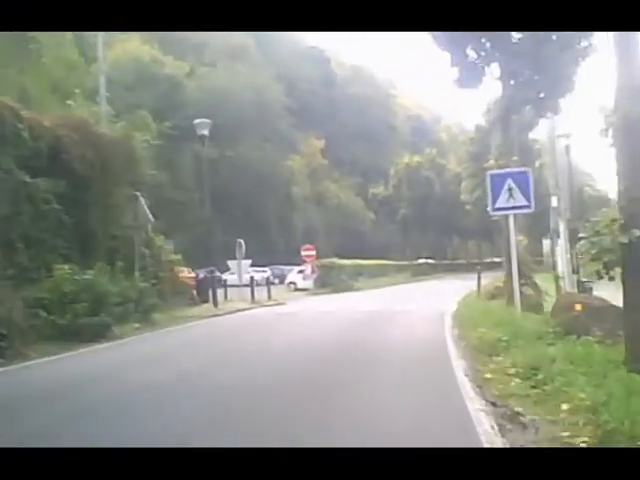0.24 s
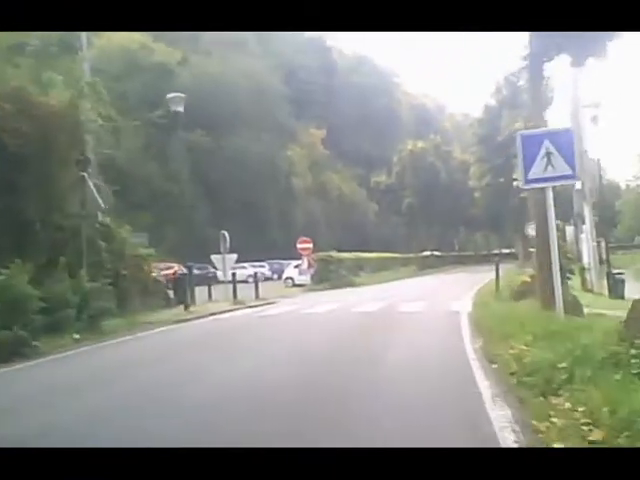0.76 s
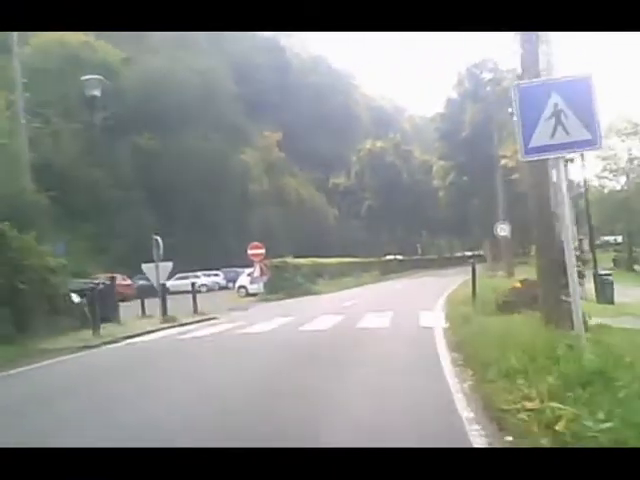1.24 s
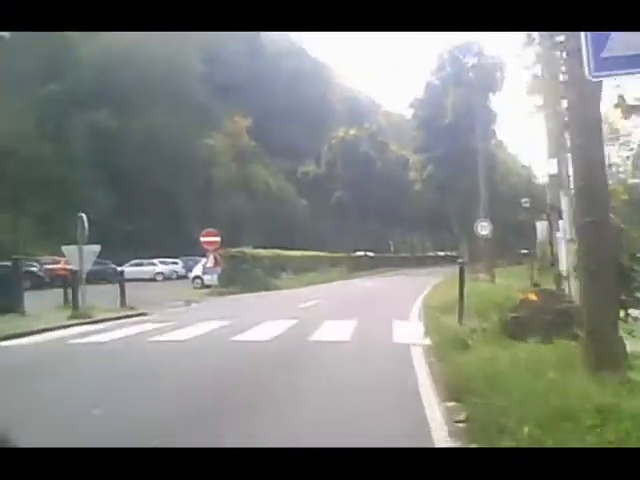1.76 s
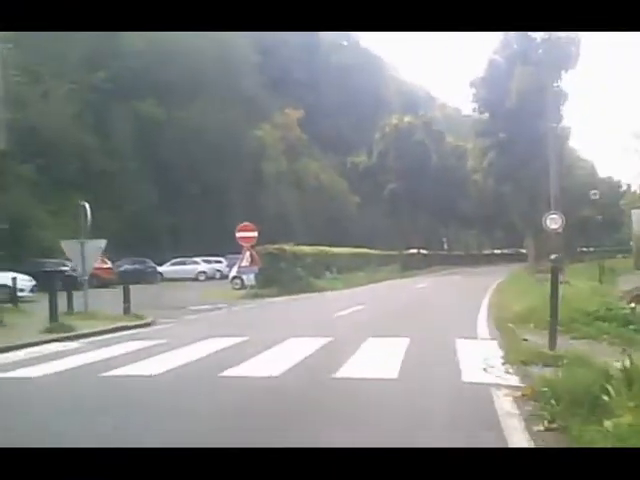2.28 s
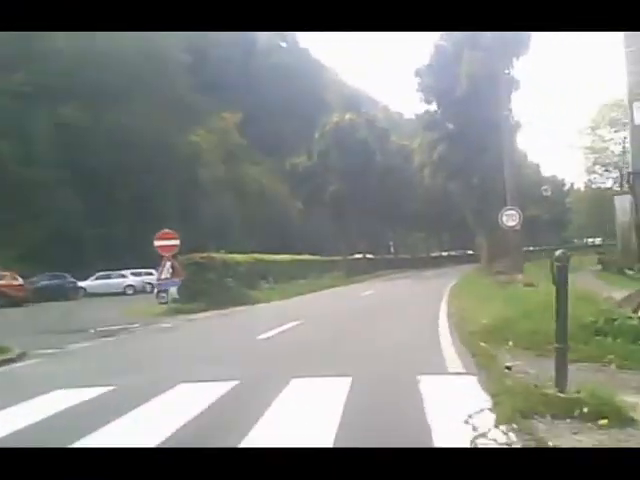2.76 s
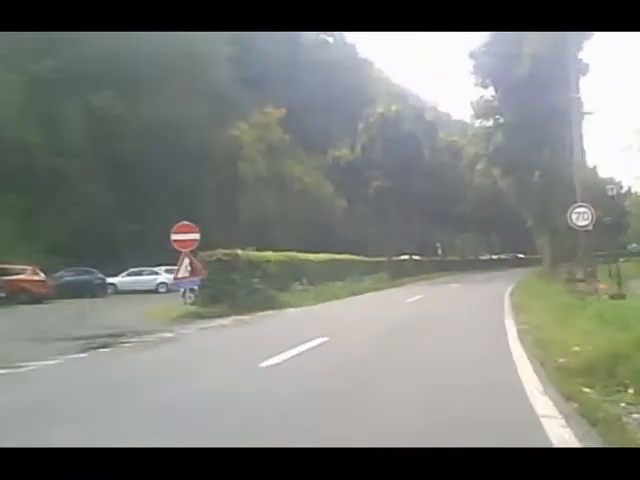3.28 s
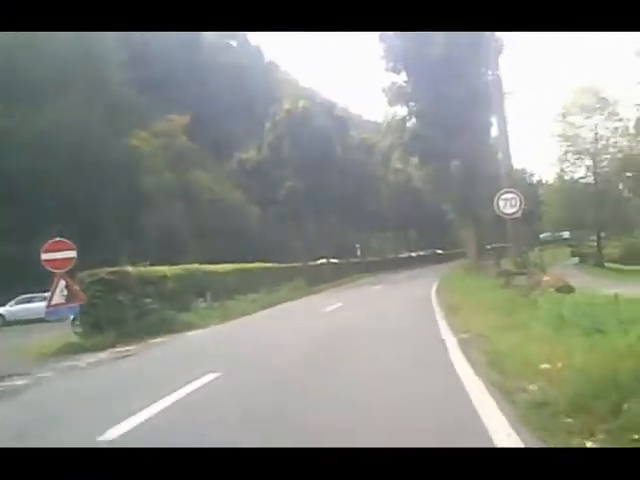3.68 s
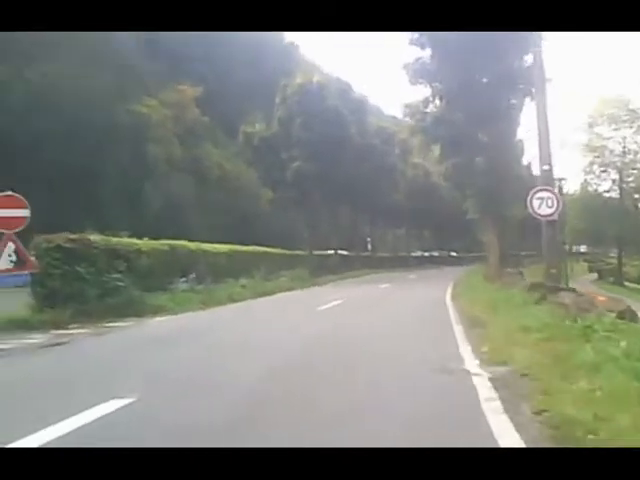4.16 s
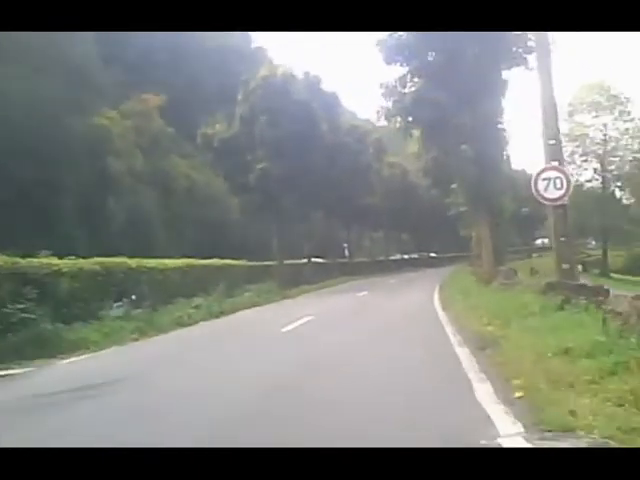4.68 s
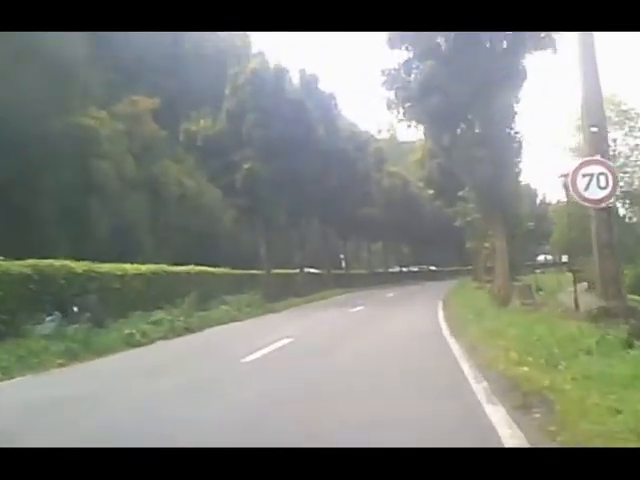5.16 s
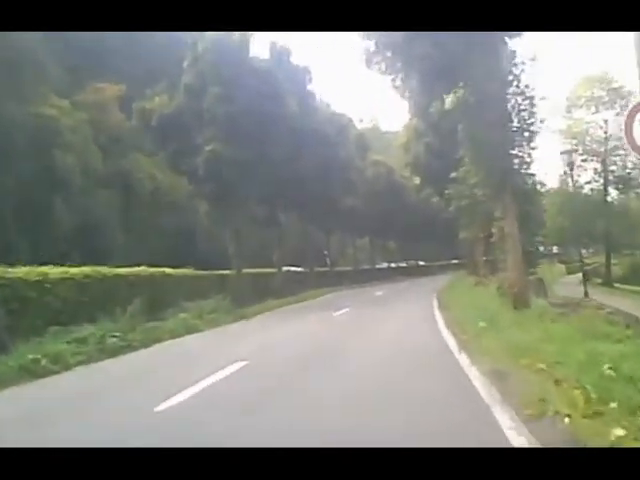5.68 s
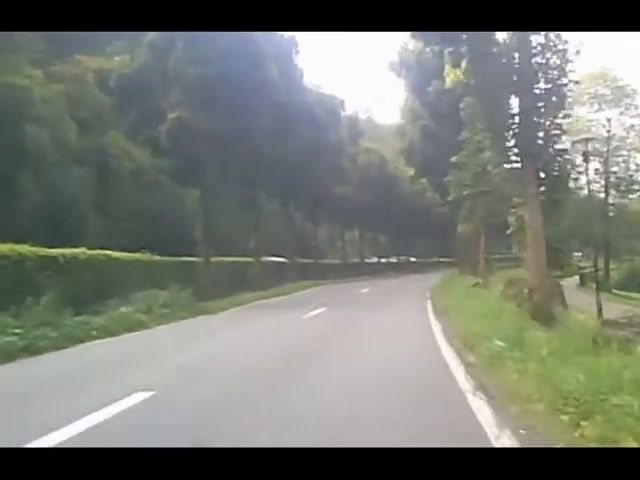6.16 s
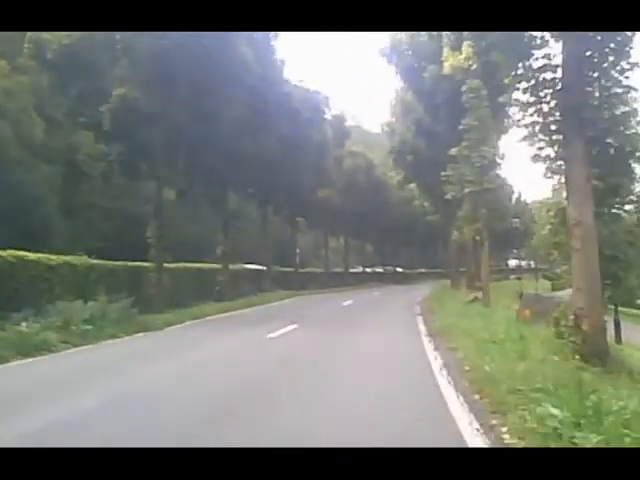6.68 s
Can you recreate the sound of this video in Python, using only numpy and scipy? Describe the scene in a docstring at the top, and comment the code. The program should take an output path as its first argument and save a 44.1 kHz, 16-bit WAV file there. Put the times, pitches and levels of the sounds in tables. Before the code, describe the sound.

A steady drive captured by a small, narrow-band microphone in the cabin. Deep humming rumble wavers continuously, with boxy road roar and soft hiss. Early on, the wheels hit rough road and crisp, dry plastic knocks come in irregular clusters, some distorting. After three seconds it calms to plain rolling noise, broken by a brief dropout and a single clack late on, then a faint tap.

```python
"""A low, wavering boom and a hollow roar fill a car rolling along a country road, under a band of hiss.
A randomly wavering low hum and a noisy rumble make the boom; noise through cabin resonances makes the roar,
and its bursts the jolts. Over a rough stretch loose plastic rattles and chatters: decaying sine modes struck
singly or by random taps. Faint bright ticks run throughout. The narrow-band sound overloads on the rattles,
and the level dips briefly twice."""
import sys
import numpy as np
from scipy import signal
from scipy.fft import rfft, irfft, next_fast_len
from scipy.io import wavfile
from scipy.ndimage import uniform_filter1d, map_coordinates

SR = 44100
rng = np.random.default_rng(int(sys.argv[2]) if len(sys.argv) > 2 else 0)


def digitize_waveform(pressure):
    """Quantize a signal to 16-bit integers and store it at the path in sys.argv[1].

    Rows of a 2-D input are taken as channels; values are limited to [-1, 1].
    """
    field = np.atleast_2d(pressure).T
    bounded = np.clip(field, -1, 1)
    quanta = np.round(bounded * 32767).astype(np.int16)
    wavfile.write(sys.argv[1], SR, quanta)


N = 305613
BAND_HZ = 3900  # upper edge of the narrow band
TOP_HZ = 16000  # upper edge of the output

# modes of the loose plastic: (frequency [Hz], relative level [dB], full 60 dB decay time [s])
PLASTIC_MODES = [(935, -7, 0.025), (1338, -2.5, 0.017), (1680, -2, 0.014), (1893, -12.5, 0.03),
                 (1981, 1.5, 0.016), (2370, -5.5, 0.01), (2760, -20.5, 0.024), (3357, -18, 0.0083)]
# wheels jolt over bumps: (time [s], burst level [dB], envelope length [s], centre frequency [Hz])
BUMPS = [(0.612, -10, 0.009, 700), (0.616, -7.5, 0.017, 129.4), (1.274, -15, 0.026, 720),
         (1.635, -15.5, 0.021, 280), (1.764, -13.5, 0.016, 910), (2.538, -10, 0.021, 696),
         (2.613, -17, 0.011, 950), (2.937, -11, 0.013, 850), (5.518, -15, 0.008, 900)]


def amp(db):
    """Logarithmic level: decibels to amplitude gain."""
    return 10 ** (np.asarray(db) / 20)


def unit(x):
    """Normalisation by mean power: scale to rms 1."""
    return x / np.sqrt(np.mean(x ** 2) + 1e-20)


def clock():
    """Uniform sampling: the time of every sample in seconds."""
    return np.arange(N) / SR


def curves(rows):
    """Linear interpolation in time: one curve for each column after the first."""
    times, *columns = np.transpose(rows)
    return [np.interp(clock(), times, column) for column in columns]


def colour(points, hz):
    """Spectral envelope: gain from (frequency [Hz], level [dB]) points on a log-frequency axis."""
    point_hz, db = np.transpose(points)
    return amp(np.interp(np.log(hz + 1), np.log(point_hz), db))


def wobble(rate):
    """Slow random modulation: a smooth curve through rate normal random knots a second."""
    knots = rng.standard_normal(int(N * rate / SR) + 4)
    return map_coordinates(knots, [clock() * rate])


def swell(s, length):
    """Gaussian envelope: a bell centred on time s, at 1/e one length away."""
    return np.exp(-((clock() - s) / length) ** 2)


def filtered(x, response):
    """Linear filtering: the spectrum of x times a response of frequency."""
    size = next_fast_len(N + SR // 2)
    hz = np.fft.rfftfreq(size, 1 / SR)
    return irfft(rfft(x, size) * response(hz), size)[:N]


def noise(response):
    """Subtractive synthesis: white noise shaped by a response, at rms 1."""
    return unit(filtered(rng.standard_normal(N), response))


def low_pass(x, edge_hz):
    """Band limitation: a very steep roll-off above the edge, without phase shift."""
    return filtered(x, lambda hz: 1 / np.sqrt(1 + (hz / edge_hz) ** 90))


def boom(hum_db=-1, rumble_db=-5, waver_hz=7.5, throb_db=1,
         swell_db=3.0, swells_per_second=19, sag_db=1.4, sags_per_second=9):
    """Random modulation: a randomly wavering low hum and a rumble in a resonance swell and sag together."""
    # drone drifting slowly in pitch and level: (time [s], pitch [Hz], level before both shares [dB])
    drone = [(0, 133.1, -12), (0.6, 137.1, -9.5), (1.25, 131, -12), (1.7, 136, -11), (2.25, 131, -13),
             (2.7, 137.1, -12), (3.25, 141.4, -14.0), (3.65, 140, -13.6), (4.05, 137.7, -11.5),
             (4.9, 139.9, -12), (5.4, 139.6, -12.5), (6.0, 136, -13), (6.5, 135.6, -11.5),
             (6.93, 134.9, -9.5)]
    # spectrum of the boom's noisy body: (frequency [Hz], relative density [dB per Hz])
    rumble_spectrum = [(20, -38.5), (50, -36), (75, -21.5), (100, -9.5), (122, -1), (136, -4.5), (152, 0),
                       (175, -8.5), (220, -30.5), (400, -59)]
    pitch_hz, drone_db = curves(drone)
    swelling_db = swell_db * np.tanh(wobble(swells_per_second))
    sagging_db = sag_db * np.maximum(wobble(sags_per_second), 0) ** 2
    level_db = drone_db + swelling_db - sagging_db
    # phase is the running integral of the wavering pitch
    phase = 2 * np.pi * np.cumsum(pitch_hz + waver_hz * wobble(45)) / SR
    hum = unit(np.sin(phase) * amp(throb_db * wobble(35)))
    rumble = noise(lambda hz: colour(rumble_spectrum, hz))
    return amp(level_db) * (amp(hum_db) * hum + amp(rumble_db) * rumble)


def cabin(hz):
    """Resonance: the road's vibration spectrum times the summed power responses of cabin modes."""
    # air and panel resonances: (centre frequency [Hz], bandwidth [Hz], relative level [dB])
    resonances = [(234, 70, -11.5), (311, 52, -8.5), (463.5, 28, 1), (512, 31, 1), (778.6, 39, -7),
                  (864.6, 50, -8), (1030, 95, -15.5), (1337, 59, -4.5)]
    # tyre roar before the resonances: (frequency [Hz], relative density [dB per Hz])
    road_spectrum = [(30, -27), (70, -19.5), (150, 8), (400, -2), (650, -2), (1000, 2.5), (1400, -7.5),
                     (1600, -16), (2600, -24), (4000, -25)]
    power = 0
    for centre_hz, width_hz, db in resonances:
        detuning = (hz * hz - centre_hz * centre_hz) / (hz * width_hz + 1e-9)
        power = power + amp(db) ** 2 / (1 + detuning ** 2)
    return np.sqrt(power) * colour(road_spectrum, hz)


def tyres(roar_gain_db=1, hiss_gain_db=1.15, grain_db=1, flutter_db=0.55, patch_db=.5):
    """Shared modulation: asphalt texture flutters roar and hiss together; patches swell the roar alone."""
    # tyre levels along the road, before the gains: (time [s], roar level [dB], hiss level [dB])
    road = [(0, -17, -28), (0.9, -17.5, -27.5), (1.7, -16.0, -26.5), (2.5, -17.5, -25.5), (3.3, -18.1, -28),
            (4.0, -19, -28), (4.9, -17.5, -28), (5.7, -17.5, -27.5), (6.1, -18, -28.5),
            (6.55, -15.5, -27.5), (6.93, -18, -27.5)]
    # tyre and air hiss: (frequency [Hz], relative density [dB per Hz])
    hiss_spectrum = [(300, -18), (1000, -0.5), (1500, -1.5), (1730, 3.5), (1860, 1), (2010, 6),
                     (2170, -1.5), (2450, -4), (2700, -14), (3300, -12.5), (3800, -25)]
    # one brief flare of the hiss: (time [s], rise [dB], length [s])
    flare = (5.403, 8.8, .012)
    roar_db, hiss_db = curves(road)
    flare_s, flare_db, flare_length = flare
    texture_db = flutter_db * wobble(22)
    roar_db = roar_db + roar_gain_db + texture_db + patch_db * wobble(8)
    hiss_db = hiss_db + flare_db * swell(flare_s, flare_length)
    hiss_db = hiss_db + hiss_gain_db + texture_db + grain_db * wobble(150)
    roar = amp(roar_db) * noise(cabin)
    hiss = amp(hiss_db) * noise(lambda hz: colour(hiss_spectrum, hz))
    return roar + hiss


def random_taps(per_second, size_db):
    """Poisson-like excitation: single-sample taps at random times with random sizes."""
    return (rng.random(N) < per_second / SR) * amp(size_db * rng.standard_normal(N))


def tapping(per_second, size_db, ring_share):
    """Modal synthesis: random taps convolved with the plastic's ring, its decays scaled by ring_share; rms 1."""
    taps = random_taps(per_second, size_db)
    t = np.arange(SR // 16) / SR
    ring = np.zeros(len(t))
    for hz, db, t60 in PLASTIC_MODES:
        fade = amp(db - 60 * t / (t60 * ring_share))
        ring += fade * np.sin(2 * np.pi * (hz * t + rng.random()))
    return unit(signal.fftconvolve(taps, ring)[:N])


def chatter(shake_db=-12, shake_length=.022, shake_lag=0.0031):
    """Random impacts: trim chatters most on the rough stretch, and each bump shakes out a dense clatter."""
    # sparse chatter between the big strikes: (time [s], level [dB])
    chatter_levels = [(0, -42.5), (1.0, -36), (1.6, -27), (2.0, -30), (2.6, -32), (3.1, -32), (3.3, -47),
                      (6.93, -47)]
    level_db, = curves(chatter_levels)
    # lag and length of the shaking in seconds
    shaken = sum(amp(db + shake_db) * swell(s + shake_lag, shake_length) for s, db, _, _ in BUMPS)
    sparse = amp(level_db) * tapping(per_second=45, size_db=6.0, ring_share=0.82)
    dense = shaken * tapping(per_second=280, size_db=2.5, ring_share=0.44)
    return sparse + dense


def ticking(per_second=32, size_db=3, centre_hz=3100, width_hz=650):
    """Broad-band impulse response: small trim parts tick through a wide band, so they hardly ring."""
    # faint, bright ticking: (time [s], level [dB])
    tick_levels = [(0, -56.5), (3.0, -49.5), (3.5, -52), (5.0, -53.5), (5.4, -44.5), (6.93, -47)]
    level_db, = curves(tick_levels)
    taps = random_taps(per_second, size_db)
    ticks = unit(filtered(taps, lambda hz: np.exp(-((hz - centre_hz) / width_hz) ** 2)))
    return amp(level_db) * ticks


def rattles(gain_db=-1.5, crack_db=-8, crack_t60=0.0088, attack=0.00068, scatter_db=2.5, detune=.015):
    """Modal impact: each contact excites the plastic's modes a little differently, over a short noise crack."""
    # plastic strikes: (time [s], strength before the gain [dB], brightness [dB per octave])
    strikes = [(0.133, -11, -2.5), (0.6029, -0.5, 5), (0.612, -4, 1), (1.094, -10, 4.5), (1.2285, 12, 9),
               (1.4324, 4.5, 1), (1.483, 6.5, 3), (1.499, -4, -6.5), (1.547, -1.5, 0), (1.586, -7.5, 0),
               (1.639, 10.5, 8.5), (1.776, 3, 1), (2.100, 6, 3), (2.154, 5.5, 1.5), (2.179, 0, -3),
               (2.232, -5, 12), (2.3224, 12.5, 14), (2.526, -4.5, -11), (2.591, -1, -3), (2.611, -4.5, -6),
               (2.742, 1.5, -7), (2.938, -7, -7), (2.977, -0.5, 3), (3.043, 5.5, 3.5), (3.149, -2.5, -2),
               (5.5224, 3.5, -3), (6.198, -6.5, -8)]
    # light touch, blow and rebound of every strike: (time from the blow [s], relative level [dB])
    touches = [(-.0025, -13), (0, 0), (.003, -11)]
    out, t = np.zeros(N + SR), np.arange(SR // 16) / SR
    hz, mode_db, t60 = np.transpose(PLASTIC_MODES)[:, :, None]
    octaves = np.log2(hz / np.median(hz))
    grit = noise(lambda f: (f > 800) & (f < BAND_HZ))
    contacts = [(s + lag, db + weaker_db, bright_db)
                for s, db, bright_db in strikes for lag, weaker_db in touches]
    for s, db, bright_db in contacts:
        # random level, pitch and phase of every mode
        size, shift, turn = rng.standard_normal((3, len(hz), 1))
        fade = amp(mode_db + bright_db * octaves + scatter_db * size - 60 * t / t60)
        modes = fade * np.sin(2 * np.pi * (hz * (1 + detune * shift) * t + turn))
        ring = np.sum(modes, axis=0)
        start = round(s * SR)
        crack = amp(crack_db + bright_db / 2 - 60 * t / crack_t60) * grit[start:start + len(t)]
        onset = 1 - np.exp(-t / attack)
        out[start:start + len(t)] += amp(db + gain_db) * (ring + crack) * onset
    return out[:N]


def jolts(spread=1.0):
    """Transient excitation: each bump is a bell-shaped noise burst coloured by the cabin's resonances."""
    out = np.zeros(N)
    t = np.arange(SR // 5) / SR - .1  # seconds from the bump
    hz = np.fft.rfftfreq(len(t), 1 / SR)
    for s, db, length, centre_hz in BUMPS:
        band = np.exp(-(np.log2((hz + 1) / centre_hz) / spread) ** 2)  # spread in octaves
        spectrum = rfft(rng.standard_normal(len(t))) * cabin(hz) * band
        burst = unit(irfft(spectrum, len(t)))
        start = round(s * SR) - len(t) // 2
        out[start:start + len(t)] += amp(db) * np.exp(-(t / length) ** 2) * burst
    return out


def scene():
    """Superposition: all sources in the cabin add in one channel."""
    return (boom() + tyres() + chatter() + ticking() + rattles() + jolts())[None]


def record(dry, overload=1.27, knee=5, faint_hiss_db=-86):
    """Saturation and band limitation: the sound dips twice, overloads, loses its treble and clips."""
    # brief dips in level: (start [s], end [s], gain [dB])
    dips = [(5.412, 5.4306, -21.5), (6.811, 6.837, -12.5)]
    dip_db = sum(db * ((clock() > start) & (clock() < end)) for start, end, db in dips)
    dipped = dry[0] * uniform_filter1d(amp(dip_db), size=40)  # edges smoothed over 40 samples
    squashed = dipped / (1 + np.abs(dipped / overload) ** knee) ** (1 / knee)
    narrow = low_pass(squashed, BAND_HZ)
    # only peaks that still pass full scale spit treble above the narrow band
    clipped = np.clip(narrow, -1, 1)
    # a faint, even hiss up to the top edge
    faint_hiss = amp(faint_hiss_db) * rng.standard_normal(N)
    return low_pass(clipped + faint_hiss, TOP_HZ)[None]


dry = scene()
out = record(dry)
digitize_waveform(out)
```